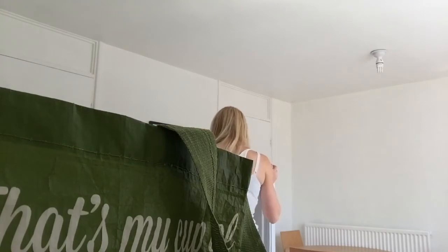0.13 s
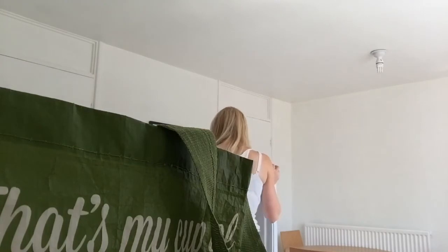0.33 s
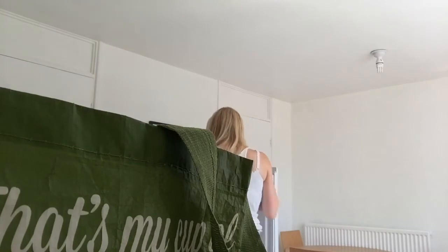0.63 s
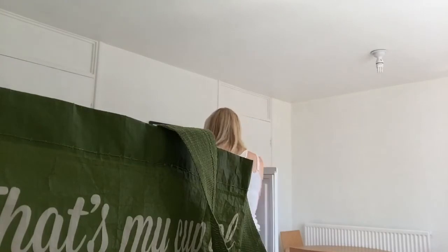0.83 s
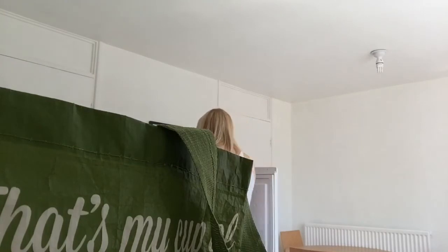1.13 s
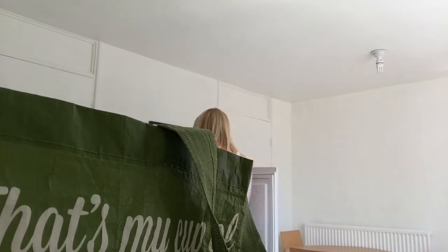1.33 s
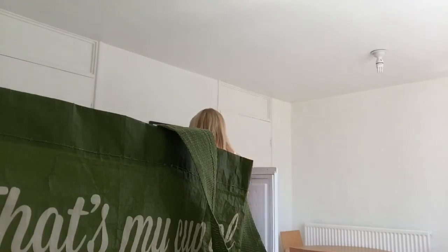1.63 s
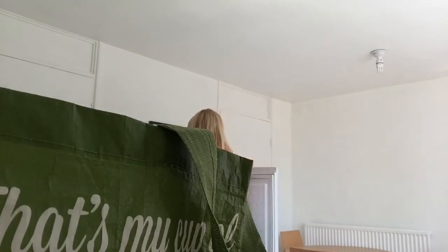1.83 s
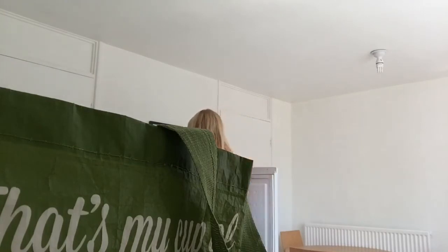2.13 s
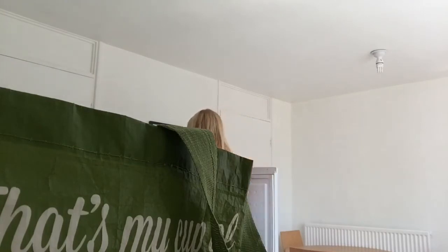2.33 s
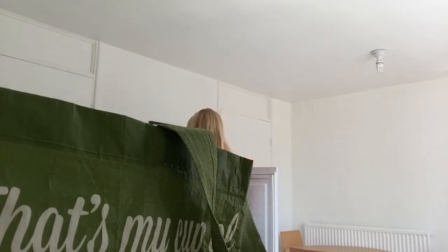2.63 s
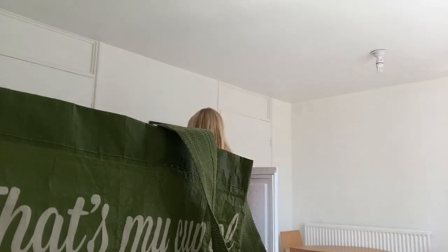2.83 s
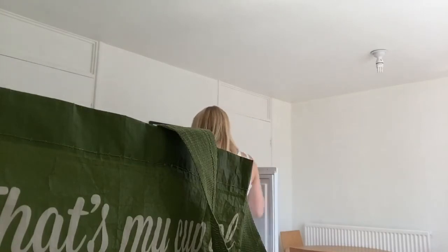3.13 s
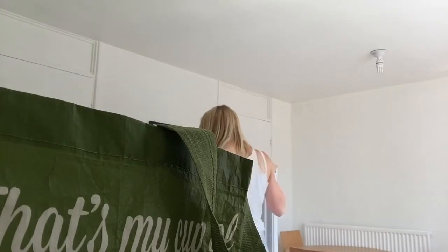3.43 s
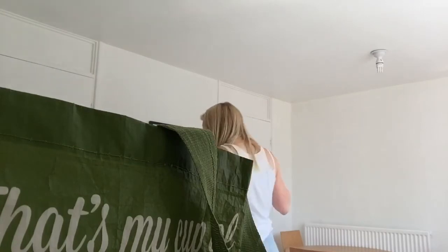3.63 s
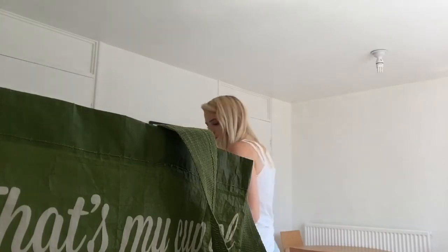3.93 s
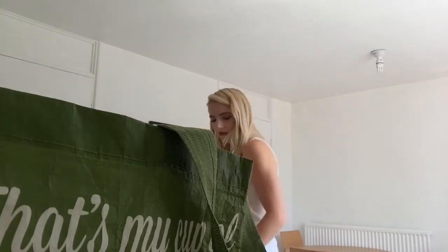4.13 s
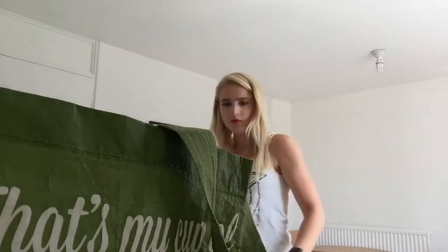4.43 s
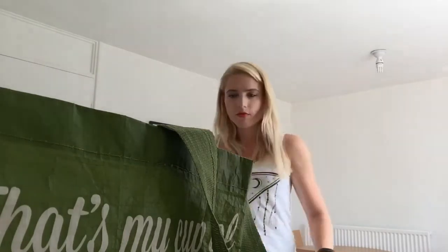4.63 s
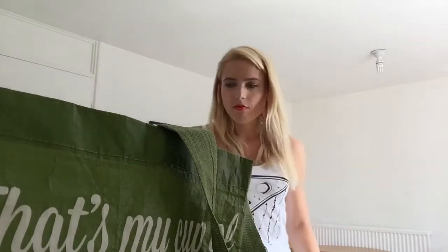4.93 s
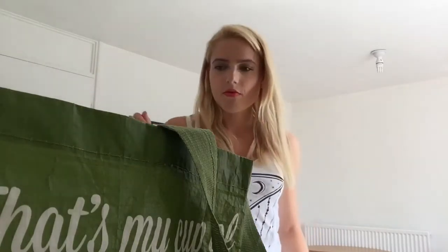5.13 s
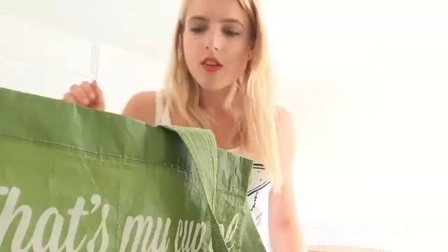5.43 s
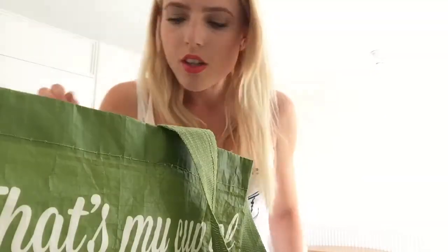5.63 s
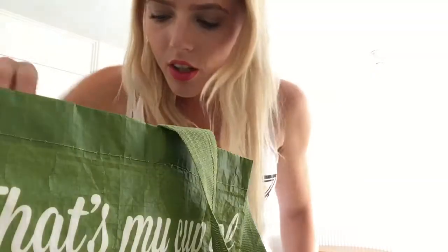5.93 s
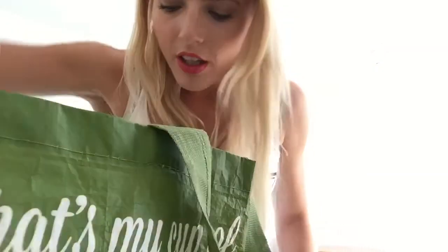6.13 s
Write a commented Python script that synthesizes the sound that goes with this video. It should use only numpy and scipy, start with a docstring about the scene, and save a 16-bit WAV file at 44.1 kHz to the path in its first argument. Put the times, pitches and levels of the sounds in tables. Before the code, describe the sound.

Irregular hollow clacks and short juddering slides come from hard frozen packs a few steps from a small microphone, with a strong drawer rumble early on. After a quiet gap and small scuffs, a freezer door slams with a low, short boom and room rumble. Shuffling feet approach, then stiff woven plastic snaps and rustles very near, over faint room air.

```python
"""Frozen packs crinkle, slide and knock in a freezer drawer in a bare kitchen; the drawer is pushed home
and the heavy door shuts with a boom. Someone shuffles over the floor, then rummages in a stiff bag close by.
Sliding and crinkling are random slips and snaps through smooth spectra and narrow resonances; blows are
short noise bursts; booms are decaying sines. Reflections add the kitchen; faint coloured noise is its air."""
import sys
import numpy as np
from scipy import signal
from scipy.io import wavfile
from scipy.ndimage import uniform_filter1d

SR = 44100
rng = np.random.default_rng(int(sys.argv[2]) if len(sys.argv) > 2 else 0)


def generate_wav(sig):
    """Save sig (samples, or channels by samples) to the path in sys.argv[1] as 16-bit PCM at SR."""
    pcm = np.round(np.clip(np.atleast_2d(sig).T, -1, 1) * 32767).astype(np.int16)
    wavfile.write(sys.argv[1], SR, pcm)


N = 277565
TIME_S = np.arange(N) / SR

# Packs and drawer knocking. Each row: start in s, hollow body level in dB, hardness in dB,
# film snap level in dB, clack pitch in Hz.
KNOCKS = [(0.151, -70, 20.5, -74, 1070), (0.27, -52, -8, -65, 2620), (0.531, -41, -5, -72, 1740),
          (0.649, -63.5, 16, -60, 2330), (0.883, -42.5, 0, -86, 1010), (1.168, -52.5, 3, -68.5, 1550),
          (1.33, -57, -4, -73.5, 1180), (1.532, -44.5, -1, -57, 2020), (1.67, -34, -3, -53, 900),
          (2.056, -49, 0.5, -59.5, 2500), (2.091, -51.5, -2.5, -60, 1670), (2.268, -58, 2.5, -58.5, 2120),
          (2.516, -44.5, -4, -77, 1060), (2.905, -45.5, 3, -54.5, 2750)]
# Heels and toes meeting the floor. Each row: start in s, hollow body level in dB, hardness in dB,
# grit level in dB, clack pitch in Hz.
STEPS = [(3.466, -58, -15, -88, 600), (4.21, -63.5, 6, -95, 1100), (5.089, -44, 0, -77, 1580),
         (5.394, -55, 2.5, -82, 1280)]
# The bag's wall buckling. Each row: start in s, hollow body level in dB, hardness in dB,
# snap level in dB, clack pitch in Hz.
BUCKLES = [(6.04, -53.5, -9.5, -90, 900), (6.072, -46, -11, -66.5, 910), (6.123, -46, -9.5, -61, 1000),
           (6.223, -44.5, 1, -68, 2410), (6.236, -38.5, -6, -66, 910), (6.278, -36.5, -4, -55.5, 2320)]
# Hardness moves a blow from thud to clack; at 0 dB both lie this far below the body.
THUD_DB, CLACK_DB = -14, -4

# Packs shoved about in the drawer. Each row: start in s, length in s, rise in s, scrape level in dB,
# level of the crinkle's film part in dB, the pack's own note in Hz; levels before the sag.
SHOVES = [(0.198, 0.31, 0.011, -79.5, -71, 990), (0.462, 0.38, 0.072, -50, -69, 820),
          (0.841, 0.23, 0.04, -49.5, -75, 835), (1.204, 0.29, 0.075, -55, -79, 980),
          (2, 0.41, 0.018, -57, -82.5, 990), (2.69, 0.34, 0.11, -59, -82.5, 640)]
SHOVE_SAG_DB, SHOVE_RELEASE_S = 4.5, 0.022
SCRAPE_CUT_HZ = 43  # sliding shakes the drawer's bass less than a blow does
# Plastic chafing on the runners. Each row: start in s, length in s, level before the sag in dB,
# pitch in Hz, sharpness Q.
CHAFES = [(0.146, 0.023, -47, 1030, 3.2), (0.236, 0.079, -53, 2420, 7.6), (0.703, 0.081, -46.5, 890, 3),
          (1.324, 0.038, -47, 945, 3.1), (2.421, 0.017, -46, 1000, 21), (2.53, 0.141, -55, 1014, 13),
          (3.118, 0.041, -62.5, 2172, 4.1), (3.124, 0.025, -59.5, 840, 3.5)]
# The loaded drawer pushed home. Each row: time in s, rumble level in dB, crinkle level in dB.
DRAWER_PUSH = [(1.53, -60.5, -68), (1.65, -41, -51.5), (1.675, -38, -60), (1.72, -46, -57.5),
               (1.76, -39, -57), (1.88, -44, -59.5), (2.0, -51.5, -70.5)]

# Soles scuffing and grit squeaking. Each row: start in s, length in s, level before the sag in dB,
# pitch in Hz, sharpness Q.
SCUFFS = [(3.915, 0.11, -60.5, 2480, 6), (3.917, 0.05, -60.5, 1860, 7), (3.998, 0.031, -59, 1780, 6.7),
          (4.0, 0.028, -69, 2540, 9), (3.975, 0.073, -72, 7500, 1.5), (4.672, 0.033, -56.5, 8850, 19),
          (5.398, 0.0042, -45, 5660, 7.2)]
# Soles dragged over the floor. Each row: start in s, length in s, rise in s, rasp in dB, hiss in dB,
# slowing in dB, top rasp centre in Hz, its fall in Hz per s; levels before speed and slowing.
DRAGS = [(4.192, 0.045, 0.041, -36, -88, 18, 2110, 1550), (4.624, 0.55, 0.038, -52, -49.5, 1.5, 2460, 2100),
         (5.334, 0.59, 0.057, -46.5, -45.5, 20, 2560, 1010)]
# The foot gathers speed for PUSH_OFF_S while its rasp climbs; the hiss dies sooner than the rasp.
DRAG_RELEASE_S, PUSH_OFF_S, CLIMB_HZ_PER_S, HISS_SAG_DB_PER_S = 0.037, 0.13, 3900, 29
# Weight rolling onto a foot. Each row: fullest at in s, level of the hollow part in dB, swell in s.
TREADS = [(5.136, -35.5, 0.019), (5.824, -38.5, 0.038)]
TREAD_FADE_S = 0.036

# Creases giving way as the bag's rim is gripped. Each row: centre in s, level before the ring in dB,
# spread in s.
CREASES = [(5.5772, -37.5, 0.0037), (5.582, -39, 0.00067), (5.6001, -30, 0.00052)]
# Their crisp ring. Each row: frequency in Hz, gain in dB.
CREASE_RING = [(400, -30), (1400, 2), (6500, -6.5), (8400, 4), (10400, -7.5), (12400, 0), (15600, -22)]
# A hand rummaging in the bag. Each row: time in s, level of the rub's hollow part in dB,
# level of the crinkle's film part in dB.
RUMMAGE = [(6.05, -60, -76.5), (6.11, -51, -63.5), (6.16, -42.5, -58), (6.3, -52.5, -63.5)]

DOOR_S = 4.4975
# Modes of door and cabinet. Each row: frequency in Hz, starting level before the swell and the seal's
# grip in dB, t60 in s, rise in s.
DOOR_MODES = [(57, 6.5, 0.34, 0.22), (92.2, -9, 0.15, 0.013), (181.9, -37, 1, 0.031)]
# Bass trapped between the walls after the slam, close pairs beating. Each row: frequency in Hz,
# starting level before the swell in dB, t60 in s.
STANDING_WAVES = [(56.5, -36, 1.25), (60.4, -43, 0.5), (92.6, -27.5, 0.59), (99.3, -37, 1.03)]
# The door's skin and shelves ringing. Each row: frequency in Hz, width in Hz, lift in dB.
PANELS = [(577, 60, 5.5), (963, 46, 4), (1180, 86, 3.5)]

# Dull bumps on something hollow (cabinet, floorboard, bag). Each row: start in s, note in Hz,
# starting level before the swell in dB, t60 in s.
BUMPS = [(0.271, 94.7, -49, 0.48), (2.521, 114, -44.5, 0.16), (3.472, 304, -51, 0.3),
         (3.494, 138, -39, 0.12), (6.066, 70.6, -42, 0.3), (6.236, 363, -23, 0.045),
         (6.279, 750, -21, 0.069)]

# Spectra of thud, hollow body, clack, crinkling film, slam, drawer rumble and still air.
# Each row: frequency in Hz, relative level in dB.
THUD = [(25, -32), (55, -5.5), (100, 5.5), (150, 2.5), (200, 3), (320, -9), (700, -64.5)]
BODY = [(40, -41.5), (100, 3.5), (350, -1), (470, -4), (650, 6.5), (1100, 5), (1400, -7.5), (2500, -8),
        (3500, -34), (8000, -102.5)]
CLACK = [(500, -16.5), (1100, 11), (1700, 20.5), (2600, 19.5), (3400, 1.5), (6000, -26.5)]
FILM = [(1760, -25), (3000, -2.5), (4040, 1), (4860, -2), (6000, 5), (9200, 4), (10300, -1), (11400, 0.5),
        (15600, -11)]
SLAM = [(70, -5), (200, -21), (350, -13.5), (480, -29.5), (600, -18), (1100, -15.5), (1400, -27),
        (1900, -24), (4800, -46), (9400, -44.5), (15600, -59)]
DRAWER = [(65, -25), (150, -4.5), (600, -1.5), (1200, -1.5), (1400, -12.5), (2600, -14.5), (3600, -32.5),
          (8000, -86)]
STILL = [(25, -15), (105, -6), (135, -16), (430, -17.5), (600, -13), (1440, -18), (3100, -24),
         (15600, -33.5)]
STILL_DB = -69.5
# Hollow resonances. Each row: frequency in Hz, width in Hz, lift in dB.
HOLLOW = [(370, 56, 11.5), (613, 130, 4.5)]
# Kitchen reverberation. Each row: frequency in Hz, t60 in s.
KITCHEN = [(80, 0.58), (500, 0.43), (1400, 0.45), (3700, 0.37), (10000, 0.42)]
RUMBLE_CUT_HZ, EDGE_HZ = 24.4, 15750


def amp(db):
    """Decibels to gain."""
    return 10 ** (np.asarray(db) / 20)


def unit(x, size=None):
    """Scales to rms 1, taken over the first size samples."""
    return x / np.sqrt(np.mean(x[:size] ** 2) + 1e-20)


def read(points, hz):
    """Reads a table on a log-frequency axis."""
    f, value = np.transpose(points)
    return np.interp(np.log(hz + 1), np.log(f + 1), value)


def fader(rows, axis):
    """One dB column of a curve as a gain, at -120 dB outside the curve."""
    rows = np.array(rows)
    return amp(np.interp(TIME_S, rows[:, 0], rows[:, axis], left=-120, right=-120))


def add(mix, at_s, sound):
    """Mixes a sound in at a given time."""
    part = mix[round(at_s * SR):][:len(sound)]
    part += sound[:len(part)]


def colour(x, spectrum, resonances=(), size=4096):
    """Causal minimum-phase filter made of a smooth spectrum and narrow resonances."""
    hz = abs(np.fft.fftfreq(size, 1 / SR))
    db = read(spectrum, hz)
    for f, width_hz, lift_db in resonances:
        db = db + lift_db / (1 + (2 * (hz - f) / width_hz) ** 2)
    response = np.exp(np.conj(signal.hilbert(np.log(amp(db)))))
    impulse = np.fft.ifft(response).real[:size // 2]
    return signal.fftconvolve(x, impulse)[:len(x)]


def room(wet_db, size=26000, spacing=14):
    """Kitchen response: direct sound, a 2.5 ms gap, then dense reflections that die band by band."""
    taps = rng.choice([-1., 1.], size) * (rng.random(size) < 1 / spacing)
    hz, t, bands = signal.stft(taps, SR, nperseg=256)
    decay = amp(-60 * t / read(KITCHEN, hz)[:, None])
    tail = signal.istft(bands * decay, SR, nperseg=256)[1][:size]
    return np.r_[1, np.zeros(SR // 400), amp(wet_db) * tail / np.linalg.norm(tail)]


def heard(x, response):
    """A sound after its way through the room."""
    return signal.fftconvolve(x, response)[:len(x)]


def grains(per_s, spread_db):
    """Tiny slips and snaps at random moments, most small and a few large."""
    size = amp(spread_db * np.minimum(rng.exponential(1, N), 4))
    sign = rng.choice([-1., 1.], N)
    return unit(size * sign * (rng.random(N) < per_s / SR))


def burst(fade_s, rise_s, size=26000):
    """The brief chatter of two surfaces meeting."""
    t = np.arange(size) / SR
    return rng.standard_normal(size) * np.exp(-t / fade_s) * (1 - np.exp(-t / rise_s))


def ring(hz, db, t60_s, rise_s):
    """One mode that swells and dies away."""
    t = np.arange(SR) / SR
    return -amp(db - 60 * t / t60_s) * (1 - np.exp(-t / rise_s)) * np.sin(2 * np.pi * hz * t)


def stroke(length_s, rise_s, sag_db, release_s):
    """Force of a sliding movement: it takes hold softly, sags and lets go."""
    t = np.arange(SR) / SR
    attack = np.minimum(t / rise_s, 1) ** 2
    hold = amp(-sag_db * np.minimum(t / length_s, 1))
    return attack * hold * np.exp(-np.maximum(t - length_s, 0) / release_s)


def chafing(rows):
    """Where two surfaces bind, fast slips gather into one narrow, squeaky band."""
    out = np.zeros(N)
    for at_s, length_s, db, hz, q in rows:
        slips = grains(per_s=3000, spread_db=0.5)[:SR]
        narrowed = signal.lfilter(*signal.iirpeak(hz, q, SR), slips)
        squeak = unit(signal.lfilter(*signal.iirpeak(hz, q / 2, SR), narrowed))
        force = stroke(length_s, rise_s=0.0024, sag_db=4.5, release_s=0.0038)
        add(out, at_s, amp(db) * squeak * force)
    return out


def blows(rows, drum, fade_s, rise_s, wet_db):
    """Each blow wakes a hollow body and a bright snap; hardness trades a drum-like thud for a pitched clack."""
    out = np.zeros(N)
    for at_s, db, hardness_db, snap_db, hz in rows:
        contact = heard(burst(fade_s, rise_s), room(wet_db))
        # long window: keeps the narrow-band thud's level steady from blow to blow
        thud = unit(colour(contact, THUD, [drum]), size=4000)
        wall = [(hz, 1.0 * hz, 12)]  # the struck wall's own damped resonance
        body = unit(colour(contact, BODY, HOLLOW), size=1100)
        clack = unit(colour(contact, CLACK, wall), size=1100)
        snap = unit(colour(contact, FILM), size=1100)
        add(out, at_s, amp(db + THUD_DB - hardness_db) * thud)
        add(out, at_s, amp(db) * body + amp(db + CLACK_DB + hardness_db) * clack + amp(snap_db) * snap)
    return out


def still_air():
    """The kitchen's faint steady rush: coloured noise whose narrow resonances give a soft hum."""
    hum = [(580, 7.3, 16.8), (678.5, 13, 13.9), (1010, 66, 9.6)]  # Hz, width Hz, lift dB
    return amp(STILL_DB) * unit(colour(rng.standard_normal(N), STILL, hum))


def bumps():
    """Soft, heavy contacts wake one low note of what they hit, swelling over about one cycle."""
    out = np.zeros(N)
    for at_s, hz, db, t60_s in BUMPS:
        add(out, at_s, ring(hz, db, t60_s, rise_s=1 / hz))
    return heard(out, room(wet_db=-16.5))


def drag(length_s, rise_s, rasp_db, hiss_db, slowing_db, top_hz, fall_hz_per_s):
    """A sole slides over grit: its rasp and overtone climb, then fall in pitch, and a fine hiss swells."""
    t = np.arange(SR) / SR
    climb_hz = CLIMB_HZ_PER_S * np.maximum(PUSH_OFF_S - t, 0)
    fall_hz = fall_hz_per_s * np.maximum(t - PUSH_OFF_S, 0)
    centre_hz = top_hz - climb_hz - fall_hz
    speed = np.minimum(t / PUSH_OFF_S, 1)
    jerks = unit(uniform_filter1d(rng.standard_normal(SR), size=900))
    grit = grains(per_s=5000, spread_db=1.0)[:SR] * amp(2.6 * np.tanh(jerks))  # the sole catches and frees
    narrow = signal.butter(3, 560, fs=SR, output="sos")  # half width in Hz

    def moving_band(carrier):
        """Band-pass that follows a gliding carrier."""
        return unit((signal.sosfilt(narrow, grit / carrier) * carrier).real)

    turn = np.exp(2j * np.pi * np.cumsum(centre_hz) / SR)
    band = moving_band(turn)
    overtone = moving_band(turn ** 3)
    rasp = amp(rasp_db) * np.sqrt(speed) * (band + amp(-14.5) * unit(colour(grit, BODY)))
    hiss_gain = amp(hiss_db - HISS_SAG_DB_PER_S * t) * speed
    hiss = hiss_gain * (unit(colour(grit, FILM)) + amp(-22) * overtone)
    return (rasp + hiss) * stroke(length_s, rise_s, slowing_db, DRAG_RELEASE_S)


def feet():
    """Soles scuff and drag over the floor, heels and toes land, and weight rolling on crunches grit."""
    sliding = chafing(SCUFFS)
    for at_s, *row in DRAGS:
        add(sliding, at_s, drag(*row))
    weight = np.zeros(N)
    for full_s, db, swell_s in TREADS:
        weight += amp(db) * np.exp(np.minimum((TIME_S - full_s) / swell_s, (full_s - TIME_S) / TREAD_FADE_S))
    crunch = grains(per_s=1500, spread_db=1.0)
    tread = unit(colour(crunch, BODY, [(550, 114, 9.1)]))
    tread += amp(-38) * unit(colour(crunch, THUD))
    tread += amp(-9.0) * unit(colour(crunch, CLACK))
    tread += amp(-29.5) * unit(colour(crunch, FILM))
    shuffle = heard(tread * weight + sliding, room(wet_db=-3.0))
    return shuffle + blows(STEPS, drum=(200, 170, 11), fade_s=0.024, rise_s=0.012, wet_db=-9.0)


def bag():
    """Close by, stiff woven plastic crackles, rubs, crinkles and buckles with little room sound."""
    folds = grains(per_s=4000, spread_db=1.5)
    rub = unit(colour(folds, BODY, HOLLOW)) + amp(-17.0) * unit(colour(folds, THUD, [(73.5, 25, 78)]))
    crinkle = unit(colour(folds, FILM)) + amp(9.0) * unit(colour(folds, CLACK))
    giving = np.zeros(N)
    for at_s, db, spread_s in CREASES:
        giving += amp(db) * np.exp(-abs(TIME_S - at_s) / spread_s)
    crackle = colour(rng.standard_normal(N) * giving, CREASE_RING)
    rummaging = rub * fader(RUMMAGE, axis=1) + crinkle * fader(RUMMAGE, axis=2)
    rustle = heard(crackle + rummaging, room(wet_db=-5))
    return rustle + blows(BUCKLES, drum=(70, 35, 15), fade_s=0.005, rise_s=0.0007, wet_db=-5)


def door():
    """The seal slaps the frame; door and cabinet boom until the seal grips, and the room rumbles on."""
    boom = np.zeros(N)
    for mode in DOOR_MODES:
        add(boom, DOOR_S, ring(*mode))
    grip_db = np.interp(TIME_S, [4.615, 4.69], [0, -30])
    boom *= amp(grip_db)
    for hz, db, t60_s in STANDING_WAVES:
        add(boom, DOOR_S, ring(hz, db, t60_s, rise_s=0.043))
    rumble = colour(burst(fade_s=0.077, rise_s=0.0081, size=SR), THUD)
    add(boom, DOOR_S, amp(-48.0) * unit(rumble, size=13000))
    slap = heard(colour(burst(fade_s=0.056, rise_s=0.004), SLAM, PANELS), room(wet_db=-8.5))
    add(boom, DOOR_S, amp(-28.5) * unit(slap, size=2200))
    escaping_air = [(DOOR_S - 0.06, -78), (DOOR_S, -48)]  # s, dB: squeezed out as the door swings home
    return boom + unit(colour(rng.standard_normal(N), SLAM)) * fader(escaping_air, axis=1)


def packs():
    """Hard packs judder, squeak and knock; the full drawer crunches along its runners and film crinkles."""
    jerks = unit(signal.fftconvolve(rng.standard_normal(N), np.hanning(SR // 25), "same"))
    catching = amp(2.5 * np.tanh(jerks))
    slips = grains(per_s=520, spread_db=2.45) * catching
    creases = grains(per_s=760, spread_db=2.5) * catching
    film = unit(colour(creases, FILM))
    crinkle = film + amp(9.0) * unit(colour(creases, CLACK))
    bass_cut = signal.butter(2, SCRAPE_CUT_HZ, "highpass", fs=SR, output="sos")
    light_slips = signal.sosfilt(bass_cut, slips)
    sliding = chafing(CHAFES)
    for at_s, length_s, rise_s, scrape_db, film_db, hz in SHOVES:
        force = np.zeros(N)
        add(force, at_s, stroke(length_s, rise_s, SHOVE_SAG_DB, SHOVE_RELEASE_S))
        scrape = unit(colour(light_slips, BODY, HOLLOW + [(hz, 170, 6)]))
        sliding += force * (amp(scrape_db) * scrape + amp(film_db) * crinkle)
    drawer_rumble = unit(colour(slips, DRAWER, [(350.5, 23, 8.8), (590, 42, 6.1)]))
    sliding += drawer_rumble * fader(DRAWER_PUSH, axis=1)
    sliding += film * fader(DRAWER_PUSH, axis=2)
    knocks = blows(KNOCKS, drum=(105, 30, 4), fade_s=0.0091, rise_s=0.0043, wet_db=7.5)
    return heard(sliding, room(wet_db=2.06)) + knocks


def scene():
    """All sources at one microphone."""
    return (still_air() + bumps() + feet() + bag() + door() + packs())[None]


def record(dry):
    """A small microphone that loses the deepest bass, then the recorder's band limit."""
    bass_cut = signal.butter(2, RUMBLE_CUT_HZ, "highpass", fs=SR, output="sos")
    thinned = signal.sosfilt(bass_cut, dry)
    band_limit = signal.firwin(511, EDGE_HZ, window=("kaiser", 9), fs=SR)
    return signal.oaconvolve(thinned, band_limit[None], "same")


dry = scene()
out = record(dry)
generate_wav(out)
```